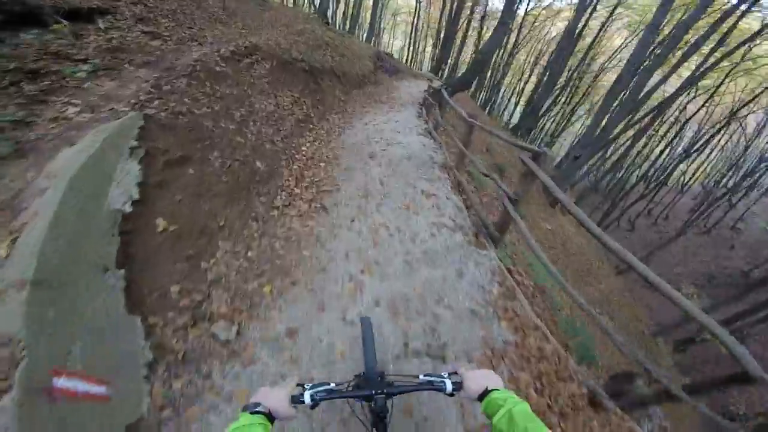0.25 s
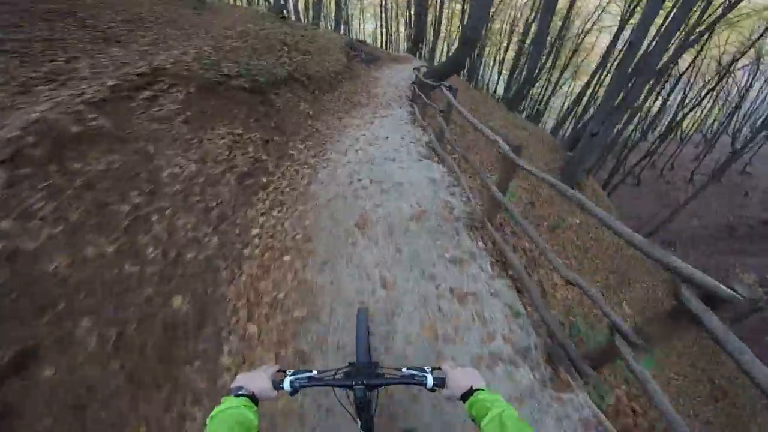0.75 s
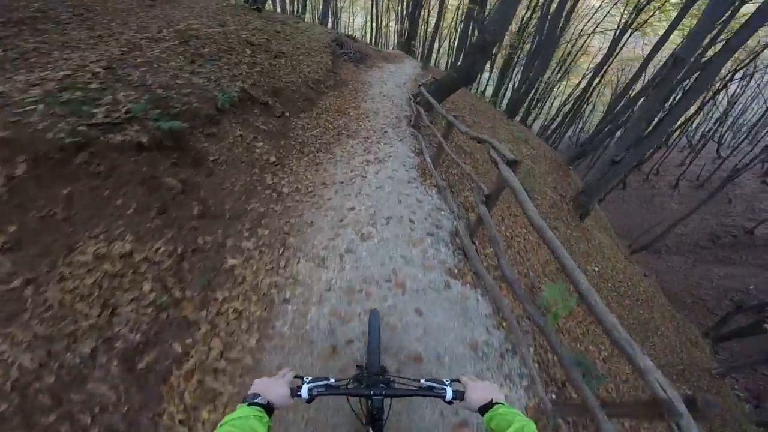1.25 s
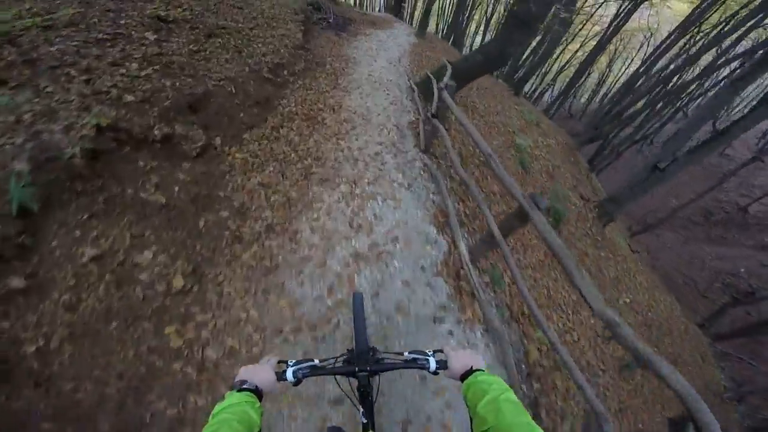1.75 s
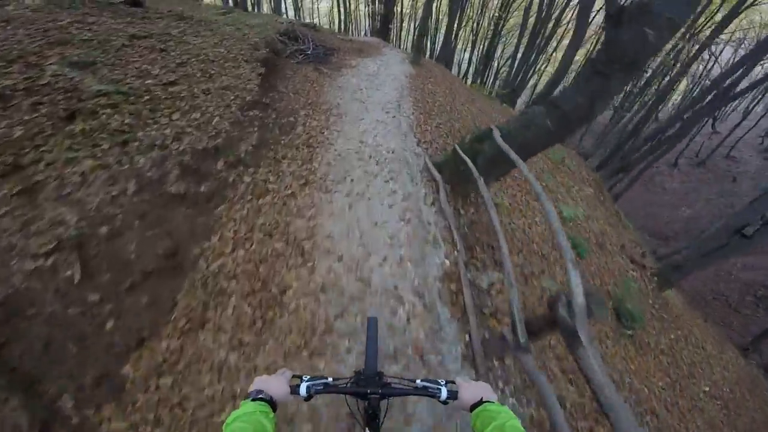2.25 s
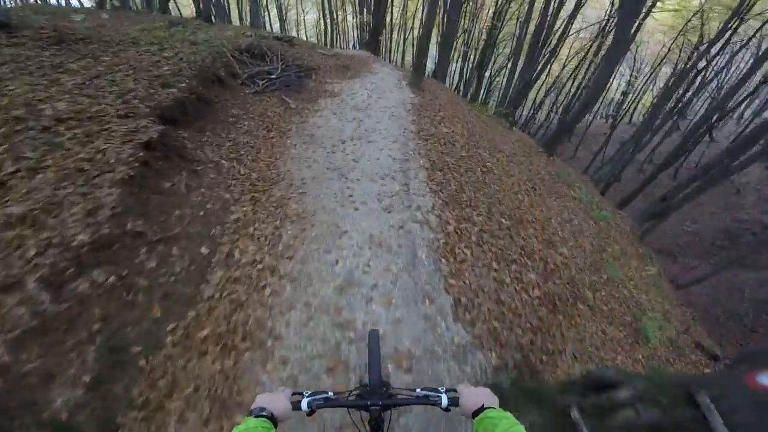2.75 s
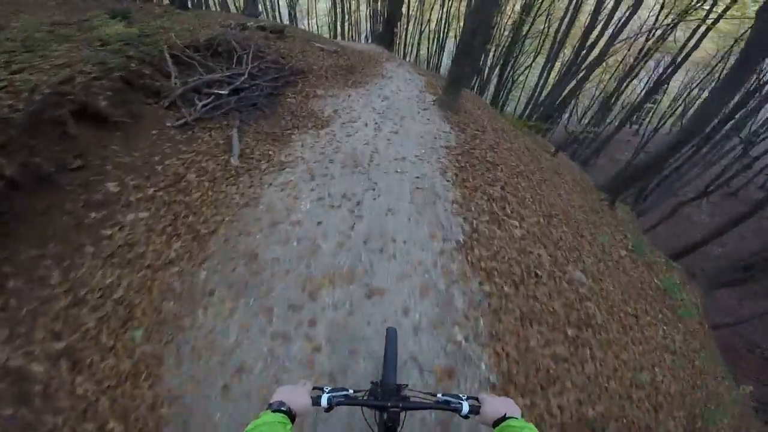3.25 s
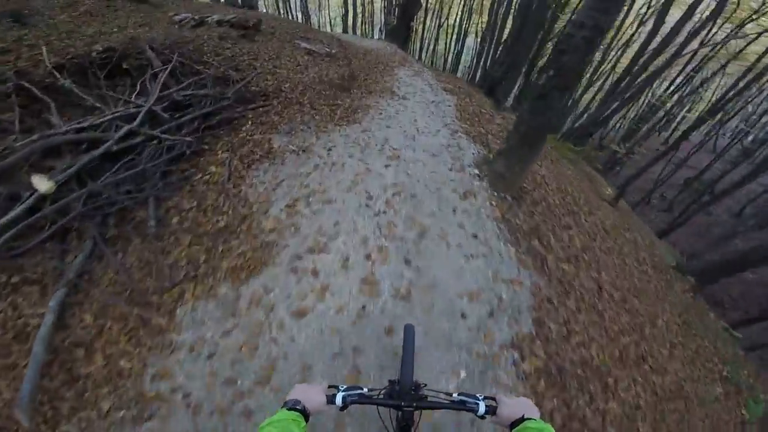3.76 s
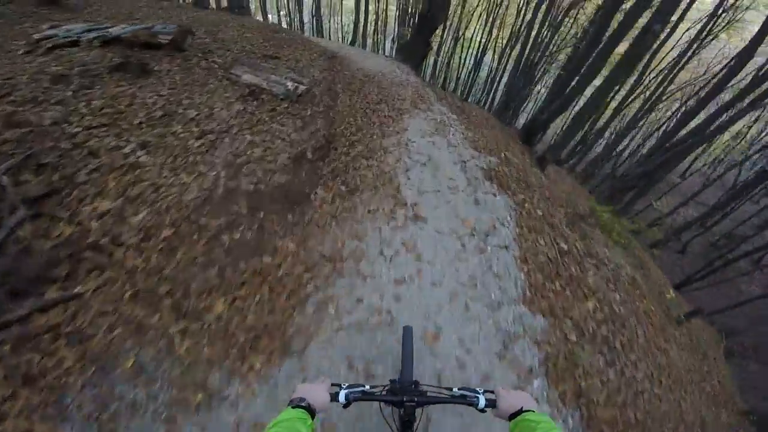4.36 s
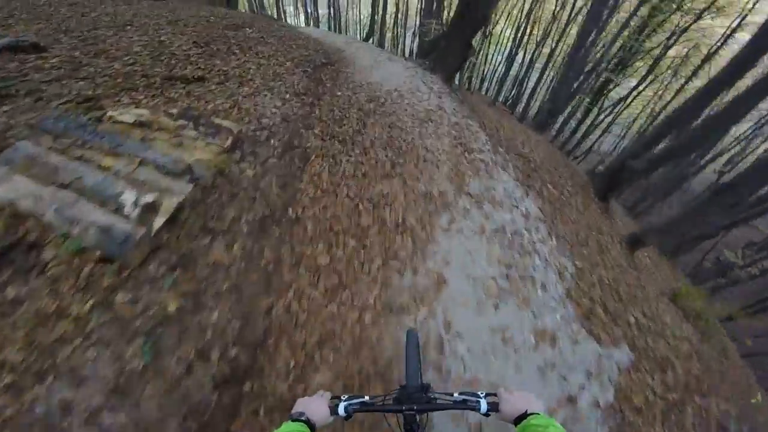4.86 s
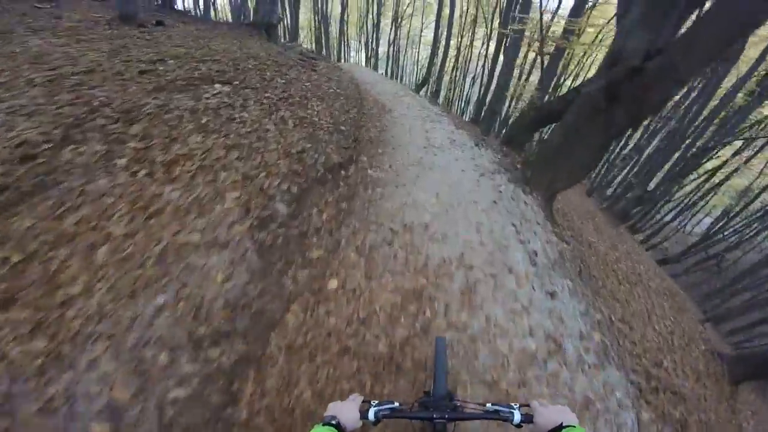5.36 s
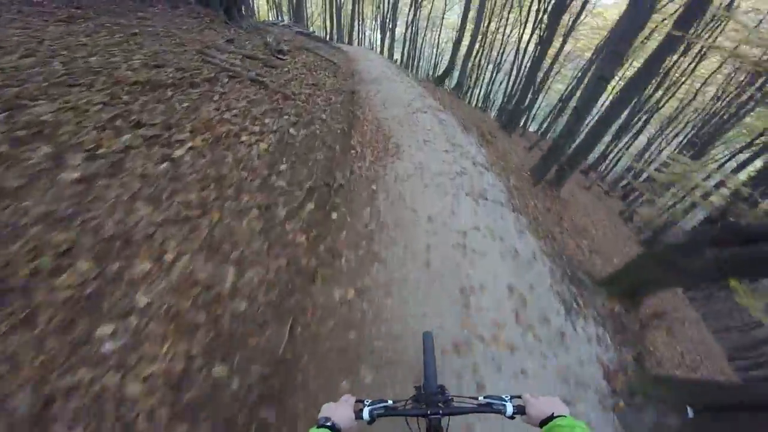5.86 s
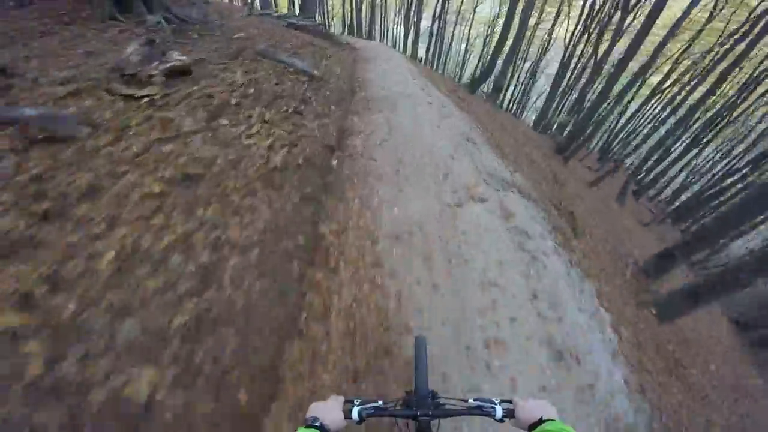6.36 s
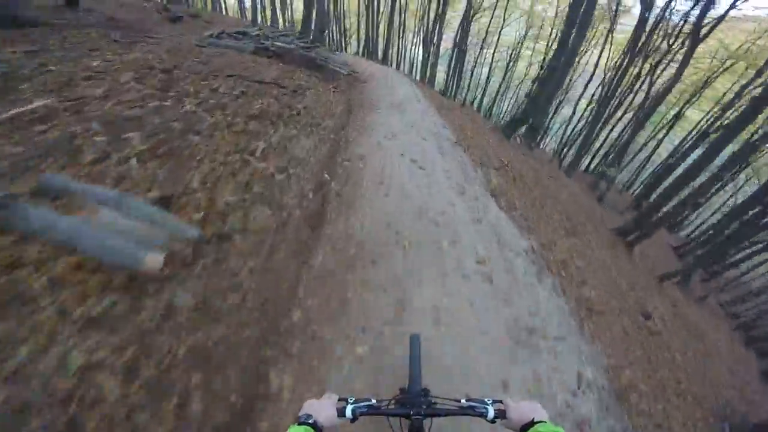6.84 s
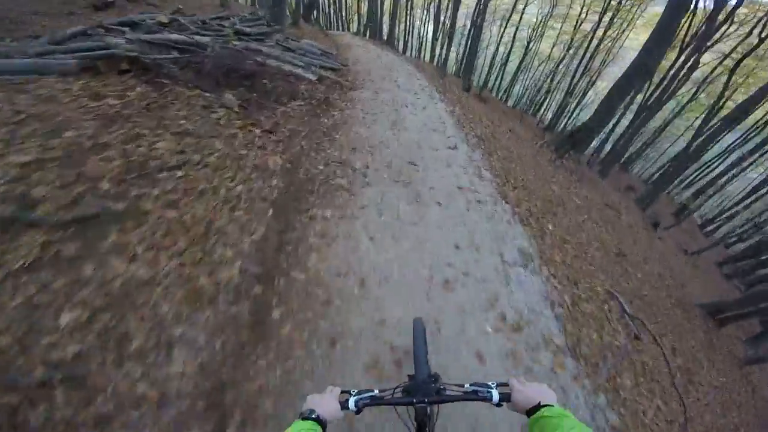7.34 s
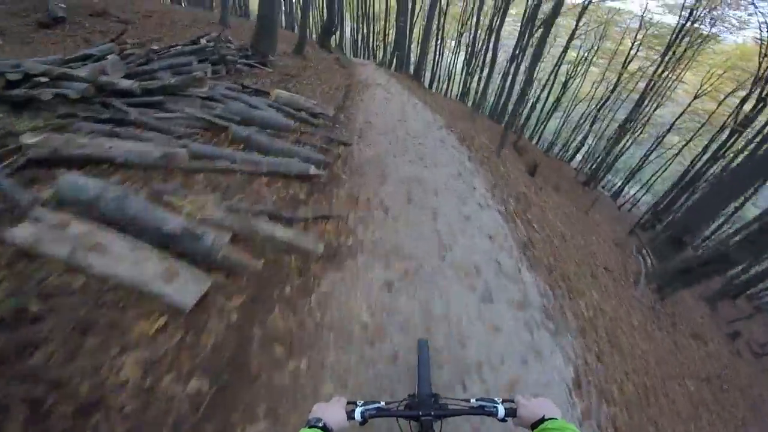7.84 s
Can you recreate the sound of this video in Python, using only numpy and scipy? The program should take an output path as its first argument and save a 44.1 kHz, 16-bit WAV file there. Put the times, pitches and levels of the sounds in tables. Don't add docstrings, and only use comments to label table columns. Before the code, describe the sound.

Outdoors, heard from a rider's helmet: gritty gravel crushing and crisp leaf crackle a metre or two below, with stones popping off the tread. The ground noise gets denser mid-way, with a bright leafy swish near five seconds. Low wind lumps hit the microphone ever harder, dominating the last two seconds while fine gravel pings underneath. Dry, open sound with no echo.

```python
import sys
import numpy as np
from scipy import signal
from scipy.fft import rfft, irfft, next_fast_len
from scipy.io import wavfile
from scipy.ndimage import uniform_filter1d, minimum_filter1d, map_coordinates

SR = 44100
rng = np.random.default_rng(int(sys.argv[2]) if len(sys.argv) > 2 else 0)


def store_pcm(level_fs):
    pcm = np.round(np.clip(level_fs, -1, 1) * 32767).astype(np.int16)
    wavfile.write(sys.argv[1], SR, np.atleast_2d(pcm).T)


def decibels_to_gain(level_db):
    exponent = np.asarray(level_db, float) / 20
    return 10 ** exponent


N = 357210

# [t/s, gravel load level/dB, leaf depth level/dB]
GROUND = [(0.0, -48, -56.5), (1.4, -46, -57), (2.3, -43.5, -50.5), (3.15, -40, -51.5), (3.38, -39.5, -56.5),
          (3.64, -36.5, -47.5), (3.8, -40.5, -53.5), (4.34, -43.5, -54), (4.6, -36.5, -51.5),
          (4.86, -36, -48), (5.1, -40, -39.5), (5.2, -35.5, -37), (5.6, -41, -38), (5.75, -42.5, -43),
          (5.9, -43, -52), (6.55, -40, -47.5), (7.1, -42.5, -54), (8.1, -41, -50.5)]


def unit(x):
    return x / np.sqrt(np.mean(x ** 2) + 1e-20)


def noise():
    return rng.standard_normal(N)


def curves(rows):
    s, *cols = np.transpose(rows)
    result = []
    for col in cols:
        line = np.interp(np.arange(N) / SR, s, col)
        result.append(uniform_filter1d(uniform_filter1d(line, size=500), size=500))
    return result


def wobble(rate):
    knots = rng.standard_normal(int(N * rate / SR) + 4)
    return map_coordinates(knots, [np.arange(N) * rate / SR])


def filtered(x, response):
    m = next_fast_len(N + 8192)
    return irfft(rfft(x, m) * response(np.fft.rfftfreq(m, 1 / SR)), m)[..., :N]


def coloured(x, spectrum):
    f, db = np.transpose(spectrum)
    return unit(filtered(x, lambda hz: decibels_to_gain(np.interp(np.log(hz + 1), np.log(f + 1), db))))


def crackle(density, spread_db, patch_db, lo_hz, hi_hz, count=6):
    luck = rng.uniform(1e-12, 1, (count, N))
    rarity = np.log(density / SR / count / luck)
    flare = np.array([wobble(40) for _ in range(count)])
    size_db = spread_db * np.clip(rarity, 0, 3.5) + patch_db * flare
    clicks = (rarity > 0) * decibels_to_gain(size_db) * (-1) ** np.arange(N)
    centre = np.geomspace(lo_hz, hi_hz, count)[:, None]
    width = np.log(hi_hz / lo_hz) / (count - 1)
    bands = filtered(clicks, lambda hz: np.exp(-.5 * (np.log((hz + 1) / centre) / width) ** 2))
    return unit(bands.sum(axis=0))


def pops(rows, cycles, tail_db, tail_s, boost_db, size=900):
    out, t = np.zeros(N + SR), np.arange(size) / SR
    luck = rng.standard_normal((len(rows), size + 2))
    for (s, db, hz), draw in zip(rows, luck):
        u = t * hz / (cycles * np.exp(.1 * draw[0]))
        wave = (u * np.exp(1 - u)) ** 3 * np.sin(2 * np.pi * hz * t + 3 * draw[1])
        scatter = draw[2:] * decibels_to_gain(tail_db - 60 * t / tail_s)
        tail = signal.fftconvolve(scatter, wave)[:size] / np.linalg.norm(wave)
        out[round(s * SR):][:size] += decibels_to_gain(db + boost_db) * (wave + tail)
    return out[:N]


def tyres():
    # [t/s, swell level/dB, length/s]
    gravel_crunch = [(0.1, 11, 0.02), (0.4, 19, 0.013), (0.45, 15, 0.011), (0.661, 16, 0.02),
                     (0.772, 13, 0.032), (0.888, 10, 0.0098), (0.98, 12, 0.037), (1.137, 11, 0.034),
                     (1.554, 20, 0.022), (1.825, 8, 0.043), (2.003, 19, 0.017), (2.13, 26, 0.012),
                     (2.31, 17, 0.017), (2.354, 6, 0.013), (2.708, 21.5, 0.022), (2.87, 23, 0.0069),
                     (3.4, 11, 0.048), (3.453, 25, 0.024), (3.79, 22, 0.038), (3.838, 12, 0.014),
                     (4.0, 12.5, 0.062), (4.092, 23.5, 0.046), (4.27, 9, 0.065), (4.798, 4.5, 0.097),
                     (4.93, 13, 0.014), (6.468, 23, 0.019), (6.503, 19, 0.015), (6.659, 16, 0.013),
                     (7.159, 21, 0.0068), (6.25, 7, 0.033), (1.28, 17, 0.017), (1.33, 8, 0.021),
                     (1.505, 6, 0.01), (1.655, 13, 0.022), (2.995, 11, 0.042), (3.1, 15, 0.037),
                     (3.15, 9, 0.044), (3.27, 9, 0.022), (3.55, 6, .03), (3.63, 5, 0.025),
                     (4.145, 16, 0.011), (6.8, 4, 0.017), (6.95, 9, 0.049), (2.56, 9, 0.014),
                     (2.96, 11, 0.017), (5.4, 6, 0.013), (2.05, 2, 0.015), (2.18, 12, 0.026),
                     (4.43, 3, 0.013), (7.335, -2, 0.012), (7.467, 2, 0.013)]
    # [t/s, swell level/dB, length/s]
    leaf_crunch = [(0.397, 11, 0.015), (0.6, 5, 0.25), (0.746, 12.5, 0.022), (0.98, 12, 0.018),
                   (1.09, 10, 0.02), (1.742, 9, 0.037), (1.784, 11.5, 0.021), (1.825, 6.5, 0.027),
                   (1.878, 9, 0.016), (2.061, 13.5, 0.021), (2.13, 12, 0.0073), (2.18, 9.5, 0.029),
                   (2.261, 16, 0.0098), (2.31, 9, 0.038), (2.354, 10, 0.02), (2.422, 11, 0.016),
                   (2.87, 10, 0.0075), (3.038, 9.5, 0.037), (3.4, 13.5, 0.037), (3.453, 13, 0.018),
                   (3.8, 6, 0.035), (4.07, 9.5, 0.027), (4.3, 10, 0.052), (4.519, 9.5, 0.013),
                   (4.79, 11.5, 0.072), (6.468, 14.5, 0.014), (6.503, 9, 0.048), (6.535, 13, 0.011),
                   (7.868, 8.5, 0.082), (7.98, 7.5, 0.029), (1.22, 7, .015), (1.36, 8, .02),
                   (1.43, 5, 0.02), (1.61, 6, 0.0091), (2.93, 9, 0.012), (3.124, 10, 0.011),
                   (3.145, 10, 0.013), (3.58, 7, 0.013), (3.67, 7, 0.014), (3.85, 8, 0.018),
                   (4.0, 7.5, 0.022), (4.245, 10, 0.019), (4.395, 12, 0.0099), (6.24, 8, 0.0083),
                   (6.355, 9.5, 0.0055), (6.6, 3, 0.087), (6.665, 10, .015), (6.692, 8, 0.026),
                   (6.79, 5.5, 0.046), (6.843, 8, .012), (6.9, 4, .015), (6.99, 6, 0.011),
                   (7.065, 7.5, 0.0094), (7.16, 7, 0.0098), (7.44, 7, 0.026), (0.1, 7, 0.014),
                   (2.56, 6, 0.018), (2.62, 6, 0.011), (3.26, 7, 0.029), (3.3, 10, .015), (3.07, 9, 0.011),
                   (4.745, 11, 0.014), (4.92, 5, .03), (5.03, 7.5, 0.017), (5.83, 2, 0.065),
                   (7.56, 4, 0.032), (7.71, 5.5, 0.051), (2.5, 6, 0.044)]
    # [f/Hz, level/dB]
    gravel_tone = [(530, -20), (900, 1.5), (1090, 0.5), (1220, 4.5), (1610, 2.5), (1810, 6.5), (2310, 3.5),
                   (2570, 0), (2820, 4.5), (3580, -6.5), (3820, -8), (5040, -12.5), (6000, -19.5),
                   (7800, -54), (13200, -120)]
    # [f/Hz, level/dB]
    leaf_tone = [(1760, -23), (3000, -2.5), (3300, -7.5), (3830, -11), (4960, -5.5), (5840, -15),
                 (6370, -11.5), (8310, -17), (12700, -32.5), (15200, -46)]
    # [f/Hz, level/dB]
    drift_tone = [(2060, -1), (3500, -2.5), (3930, -11), (4230, -2), (5000, -0.5), (5830, -12.5),
                  (6510, -5), (7540, -16), (8320, -10), (9300, -21.5), (14500, -36), (15200, -39)]

    gravel_db, leaf_db = curves(GROUND)
    leaf_swell = swells(leaf_crunch + random_swell_rows(count=20))
    gravel_swell = swells(gravel_crunch)
    clump = 1.5 * np.tanh(wobble(60) / 1.1)

    grit = crackle(1400 * decibels_to_gain(2.5 * clump), spread_db=2.0, patch_db=1.5, lo_hz=900, hi_hz=6300)
    grit = grit + .5 * decibels_to_gain(1.6 * clump) * noise()
    gravel = decibels_to_gain(gravel_db + 0.5 * gravel_swell - 1.9) * coloured(grit, gravel_tone)

    crisp = crackle(3500 * decibels_to_gain(2.0 * clump), spread_db=3.0, patch_db=4.0, lo_hz=3030, hi_hz=15000)
    crisp = crisp + 0.5 * decibels_to_gain(0.39 * clump) * noise()
    swish = decibels_to_gain(1.8 * clump + 1.26 * wobble(11.0)) * noise()
    depth = np.clip((leaf_db + 58.0) / 8, 0, 1)
    leaves = np.sqrt(1 - 0.77 * depth) * coloured(crisp, leaf_tone)
    leaves = leaves + np.sqrt(depth) * coloured(swish, drift_tone)

    bumps = decibels_to_gain(0.5 * gravel_swell + 2.4 * clump) * noise()
    hum = decibels_to_gain(gravel_db + 18.5) * filtered(bumps, casing)
    return gravel + decibels_to_gain(leaf_db + leaf_swell + 0.2) * leaves + hum


def swells(rows):
    out, t = np.zeros(N), np.arange(-SR // 10, SR // 10) / SR
    for s, db, length in rows:
        at = np.clip(round(s * SR) + np.arange(len(t)) - SR // 10, 0, N - 1)
        side = np.where(t < 0, .75, 1.2)
        out[at] = np.maximum(out[at], db * np.exp(-np.log(2) * (2 * t / length / side) ** 2))
    return out


def random_swell_rows(count):
    when = rng.uniform(.01, .99, count)
    size, length = rng.standard_normal((count, 2)).T
    swell_db = 3.5 + 1.5 * np.tanh(size)
    length_s = 0.0087 * np.exp(.4 * length)
    return list(zip(when * N / SR, swell_db, length_s))


def casing(hz):
    # [f/Hz, width/Hz, level/dB]
    modes = [(311, 33, 2.5), (525, 92, -4.5), (665.4, 46, 1), (823, 69, -4), (1211, 55, -7)]
    total = 0
    for k, (centre, width, db) in enumerate(modes):
        damping = 1j * hz * width
        total = total + (-1) ** k * decibels_to_gain(db) * damping / (centre * centre - hz * hz + damping)
    return total / (1 + 1j * hz / 2200) ** 3


def flying_stones():
    # [t/s, peak level/dB, f/Hz]
    squeezed = [(0.0956, -27.5, 2730), (0.1642, -27, 2690), (0.4032, -28, 2750), (0.7128, -26, 2240),
                (0.9788, -24, 2150), (1.1218, -21.5, 2650), (1.4036, -28, 2600), (1.6532, -29, 2310),
                (1.888, -18, 2190), (2.0587, -28.5, 1860), (2.179, -19.5, 1790), (2.611, -21.5, 2260),
                (2.7078, -23, 2130), (2.8707, -22.5, 1860), (3.044, -19, 2220), (3.1744, -21, 2020),
                (3.407, -17, 1860), (3.6264, -28, 1900), (3.767, -26, 2050), (3.801, -20.5, 1900),
                (4.013, -24, 1710), (4.2728, -22, 2010), (4.434, -13.5, 2180), (4.6354, -16, 2160),
                (4.9354, -22, 1840), (5.059, -21, 2100), (5.4261, -22, 1990), (6.4579, -24, 1620),
                (7.336, -19.5, 2500), (7.4664, -23, 1970)]
    # [t/s, peak level/dB, f/Hz]
    chips = [(0.1147, -24.5, 2820), (0.238, -34, 1720), (0.4459, -29, 2400), (0.7975, -23, 2660),
             (1.0295, -29, 1740), (1.1615, -29, 2300), (1.273, -41, 2030), (1.3243, -25, 1730),
             (1.3787, -27, 2740), (1.431, -27, 2410), (1.45, -34, 1610), (1.5045, -36, 1820),
             (1.5486, -24, 1670), (1.6107, -30, 1790), (1.7866, -36, 2260), (1.8228, -27, 1730),
             (1.936, -25, 1940), (1.9647, -29, 1780), (2.005, -32, 1560), (2.104, -32, 2140),
             (2.1261, -35, 2810), (2.2574, -32, 1980), (2.3022, -42, 1910), (2.4185, -25.5, 1900),
             (2.5631, -22, 2030), (2.7567, -23, 2170), (2.859, -34, 1900), (2.9913, -20, 1860),
             (3.067, -24, 1990), (3.148, -23, 2810), (3.2116, -20, 1880), (3.257, -27, 2010),
             (3.3468, -29, 2080), (3.3905, -35, 1760), (3.4432, -26, 1800), (3.51, -22, 1700),
             (3.547, -30, 2100), (3.5758, -31, 2240), (3.7229, -31, 2190), (3.7848, -22, 1990),
             (4.059, -38, 1680), (4.0736, -39, 2800), (4.0864, -39, 2360), (4.143, -22, 2140),
             (4.2435, -27, 1910), (4.4618, -28, 2950), (4.5394, -19, 1850), (4.5855, -30, 2090),
             (4.79, -31, 2050), (4.9821, -23, 1870), (5.2762, -24, 1840), (5.3624, -17, 1860),
             (5.5513, -19, 1710), (5.7593, -20.5, 1880), (5.8895, -28, 1630), (5.972, -22, 2600),
             (6.043, -32, 2100), (6.0681, -36, 1930), (6.105, -25, 2060), (6.2337, -25, 2910),
             (6.2514, -41, 2730), (6.2642, -27, 1860), (6.298, -26, 2120), (6.3774, -28, 2790),
             (6.3984, -24, 1780), (6.427, -29, 1610), (6.4764, -25, 1820), (6.5004, -26, 2000),
             (6.5715, -32, 1910), (6.595, -35, 1530), (6.6265, -27, 1530), (6.6578, -27, 1910),
             (6.803, -31, 1870), (6.8447, -25, 2380), (6.8797, -25, 2480), (6.8962, -36, 1760),
             (6.9144, -39, 1740), (6.9245, -30, 1730), (6.9824, -34, 1810), (7.0666, -31, 1650),
             (7.16, -37, 2030), (7.1822, -31, 1680), (7.207, -39, 1780), (7.2669, -32, 1550),
             (7.2833, -27, 1900), (7.6287, -26, 2930), (7.4131, -29, 1930), (7.683, -29, 1940),
             (7.6934, -32, 1820), (7.8356, -23, 2130), (7.882, -37, 1880), (1.717, -29, 2100),
             (3.522, -28, 2600), (3.703, -25, 1900), (5.404, -22, 1500)]
    stones = pops(squeezed + grit_rows(count=60), cycles=.95, tail_db=-15, tail_s=.018, boost_db=4)
    stones = stones + pops(chips, cycles=.85, tail_db=-15, tail_s=.018, boost_db=1)
    knocks = filtered(np.abs(stones), casing)
    return stones + knocks


def grit_rows(count):
    when = rng.uniform(.01, .99, count)
    load_db = curves(GROUND)[0][(when * N).astype(int)]
    pitch_hz = 2260 * np.exp(0.59 * np.tanh(rng.standard_normal(count)))
    return list(zip(when * N / SR, load_db + 4, pitch_hz))


def snapping_litter():
    # [t/s, peak level/dB, f/Hz]
    twigs = [(0.192, -26.5, 5130), (0.4454, -34, 4730), (0.9767, -39, 5190), (1.5379, -31, 4940),
             (1.7076, -19, 4600), (1.827, -21.5, 4640), (2.136, -24, 4900), (2.2588, -28, 4800),
             (2.3146, -25, 4800), (3.0255, -41, 4640), (3.0444, -25, 5230), (3.1236, -31, 5120),
             (4.0586, -25, 5230), (4.3935, -31, 4520), (5.0625, -18, 4770), (6.4647, -33, 4830),
             (6.501, -21, 5100), (7.3347, -29.5, 4540)]
    # [t/s, peak level/dB, f/Hz]
    ticks = [(1.212, -42, 4830), (1.7384, -26, 4840), (1.7714, -27, 4650), (1.871, -32, 4980),
             (2.0567, -36, 4700), (2.0647, -36, 4780), (2.168, -28, 4850), (2.4169, -25, 4740),
             (2.5641, -30, 4690), (2.8559, -39, 4870), (3.1403, -35, 4830), (3.4476, -36, 4960),
             (3.5099, -30, 4940), (3.8337, -38, 4890), (3.9928, -40, 5140), (4.0674, -34, 5180),
             (4.2423, -41, 5140), (4.4618, -32, 4870), (4.6049, -34, 4590), (4.9112, -25, 4550),
             (4.9292, -25, 5030), (4.9935, -36, 4580), (5.021, -29, 4970), (5.1627, -24, 5030),
             (5.548, -22, 4930), (5.6451, -20, 5030), (6.6648, -36, 4940), (6.6897, -29, 4570),
             (6.761, -28, 4640)]
    # [t/s, peak level/dB]
    cracks = [(0.4454, -45), (0.5771, -45), (1.7419, -39), (1.8701, -43), (1.8871, -40), (2.0474, -39),
              (2.4937, -40), (2.7033, -41), (3.043, -33), (3.3887, -36), (3.459, -36), (3.5099, -51),
              (5.01, -35), (5.1307, -37.5), (5.5468, -35), (5.9504, -39), (6.5345, -32), (7.0594, -44),
              (7.2509, -48), (7.5044, -46)]
    crack_rows = [(s, db, 7000) for s, db in cracks]
    snaps = pops(twigs, cycles=1.7, tail_db=-11, tail_s=.015, boost_db=-2)
    snaps = snaps + pops(ticks, cycles=0.83, tail_db=-7, tail_s=0.014, boost_db=-4.0)
    return snaps + pops(crack_rows, cycles=0.55, tail_db=-12, tail_s=0.0099, boost_db=3.5)


def wind():
    # [t/s, strength level/dB]
    headwind = [(0.0, -48.5), (0.4, -41), (1.0, -38.5), (1.6, -36), (1.95, -37), (2.22, -29.5),
                (2.8, -23.5), (3.25, -25), (4.22, -30), (4.6, -21), (4.9, -27.5), (5.5, -23.5),
                (5.9, -21.5), (6.05, -18), (6.6, -16.5), (7.1, -16), (7.55, -19), (8.1, -18.5)]
    # [f/Hz, level/dB]
    buffet_tone = [(8.8, -63), (15, -6), (38, 6.5), (80, -6), (100, -56), (180, -120)]
    # [f/Hz, level/dB]
    thump_tone = [(35, -38), (60, 4.5), (106, 4.5), (220, -14.5), (290, -11.5), (480, -120)]
    # [f/Hz, level/dB]
    roar_tone = [(88, -51), (150, 0), (544, -15), (731, -23), (924, -33), (1200, -40), (1560, -76),
                 (2640, -120)]
    # [t/s, peak level/dB, f/Hz]
    slaps = [(0.706, -18.5, 80.7), (1.288, -18.5, 105), (2.172, -10, 79), (2.409, -6, 81), (2.527, -3, 81),
             (2.819, -10, 103), (2.904, -4, 112), (4.36, -14, 79.5), (4.54, -5, 106), (4.63, -0.5, 81),
             (4.759, -6, 122), (6.8, -4, 87), (6.963, 14, 175), (7.015, -5, 81), (7.179, -3, 92),
             (8.009, 0, 116), (3.042, -1, 95), (2.93, -20, 109), (6.797, -5, 98), (6.918, -1, 108),
             (7.19, -5, 109), (4.664, -2, 110), (7.994, -9, 122)]
    # [t/s, peak level/dB, f/Hz]
    lumps = [(2.384, -11, 80), (3.034, -18, 120), (3.535, -5, 123), (4.029, -7.5, 88.5), (5.028, -20, 125),
             (5.436, -6, 81), (5.633, -16, 88.8), (5.745, -4, 92), (5.977, 1.5, 133), (6.053, -2, 81),
             (6.472, -0.5, 90), (7.375, 4, 102), (7.742, -3, 85), (7.814, 0, 80.7)]

    strength_db, = curves(headwind)
    push, knock = gusts()
    calm_db = -30
    above_calm = strength_db - calm_db
    buffet_db = strength_db + push
    thump_db = calm_db + 1.035 * above_calm + knock - 1.67
    roar_db = calm_db + 1.176 * above_calm + 0.21 * push + 0.59 * knock - 6.5

    eddy = 1.4 * np.tanh(wobble(24) / 1.2)
    buffet = unit(decibels_to_gain(2.4 * eddy) * coloured(noise(), buffet_tone))
    thump = unit(decibels_to_gain(1.7 * eddy) * coloured(noise(), thump_tone))
    roar = unit(decibels_to_gain(2.1 * eddy + 1.7 * wobble(45)) * coloured(noise(), roar_tone))
    gust = decibels_to_gain(buffet_db) * buffet + decibels_to_gain(thump_db) * thump + decibels_to_gain(roar_db) * roar
    gust = gust + pops(slaps, cycles=0.57, tail_db=-44, tail_s=.02, boost_db=-5.5, size=3000)
    gust = gust + pops(lumps, cycles=0.69, tail_db=-42, tail_s=.02, boost_db=-7, size=3000)

    reach = -minimum_filter1d(-np.abs(gust), size=900)
    give = uniform_filter1d((1 + (reach / .8) ** 5) ** -.2, size=900)
    return gust * give


def gusts():
    # [t/s, slow push level/dB, thump level/dB, length/s]
    gust_rows = [(0.667, 12, 7, 0.034), (0.844, -1, -2, 0.088), (1.052, 1.5, 5, 0.08), (1.34, 5, 5, 0.048),
                 (1.477, -5, -4, 0.045), (1.576, -10, -17, 0.053), (1.68, 4, 2, 0.3), (1.91, -8, -5, 0.054),
                 (2.474, 6.5, 3, 0.12), (2.914, 9, 3, 0.15), (3.067, 6, 3, 0.11), (3.587, 9, 5, 0.16),
                 (3.919, 10.5, -2, 0.048), (4.07, 10, 14, 0.059), (4.16, 5, -11, 0.03),
                 (4.395, 7.5, 3.5, 0.092), (4.767, 7, 6, 0.18), (5.057, 9, 8, 0.072), (5.25, 7, 7.5, 0.14),
                 (5.506, 11, 2, 0.13), (5.685, 5.5, 6.5, 0.055), (6.724, -2, -9, 0.17),
                 (6.999, 7.5, 4.5, 0.059), (7.056, -17, -4, 0.038), (7.187, 0, 8.5, 0.046),
                 (7.356, -2, 3, 0.12), (7.516, -6, -5, 0.041), (7.76, 7, 5, 0.024), (7.935, 3, 10, 0.2),
                 (7.133, -11, 4, 0.05), (7.296, -13, 6, 0.037), (2.247, 10, 6, 0.066),
                 (5.206, -13, 2.5, 0.061), (6.217, 3.5, 2, 0.049)]
    s, push_db, thump_db, length = np.transpose(gust_rows)
    t = np.arange(0, N + 100, 100) / SR
    bump = np.exp(-np.log(2) * (2 * (t[:, None] - s) / length) ** 2)
    return [np.interp(np.arange(N) / SR, t, bump @ db) for db in (push_db, thump_db)]


def microphone_hiss():
    # [f/Hz, level/dB]
    hiss_tone = [(4120, -31), (7000, -6), (9190, -9.5), (12100, -3), (15200, -23)]
    return decibels_to_gain(-77.0) * coloured(noise(), hiss_tone)


def scene():
    trail = tyres() + flying_stones() + snapping_litter()
    return (trail + wind() + microphone_hiss())[None]


def band_limit(x):
    return signal.sosfilt(signal.butter(12, 15610, fs=SR, output="sos"), x)


def record(dry):
    mix = filtered(dry, lambda hz: hz < 15050)
    return band_limit(mix)


dry = scene()
out = record(dry)
store_pcm(out)
```